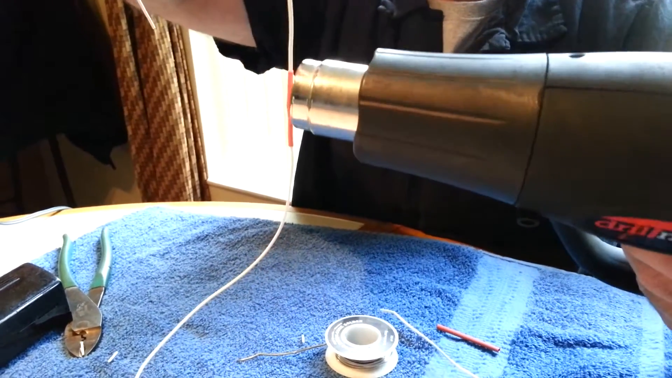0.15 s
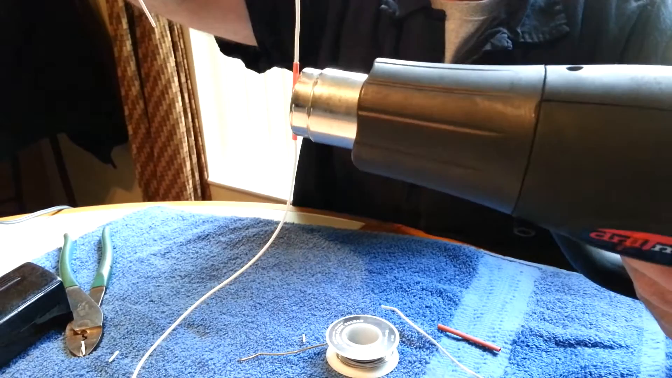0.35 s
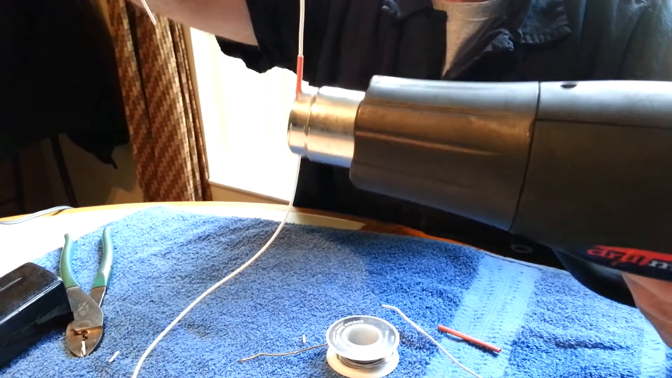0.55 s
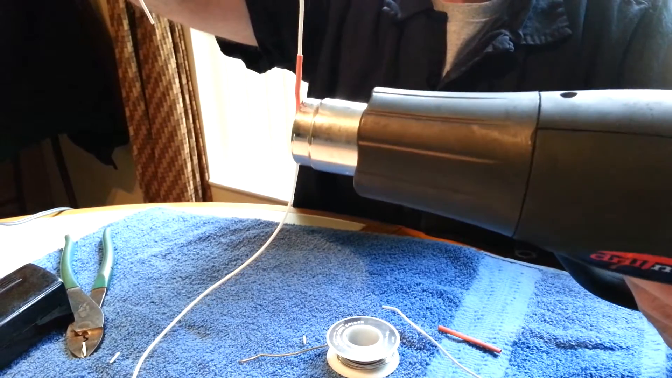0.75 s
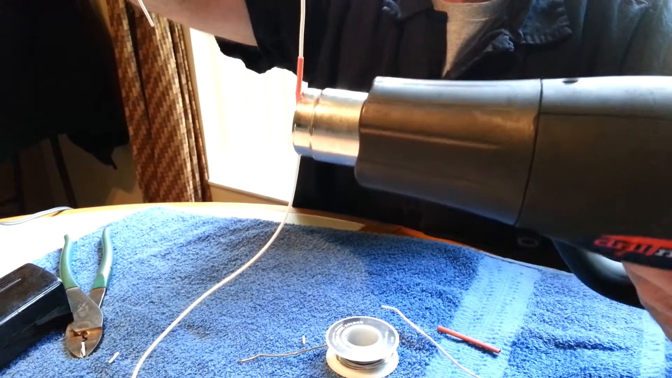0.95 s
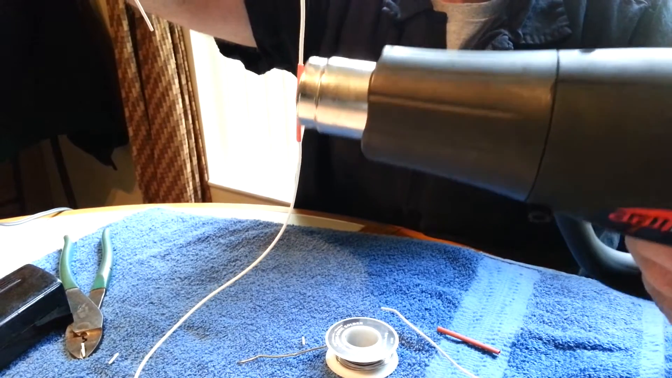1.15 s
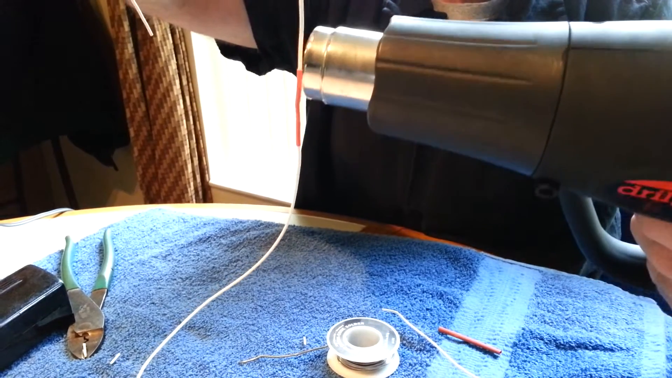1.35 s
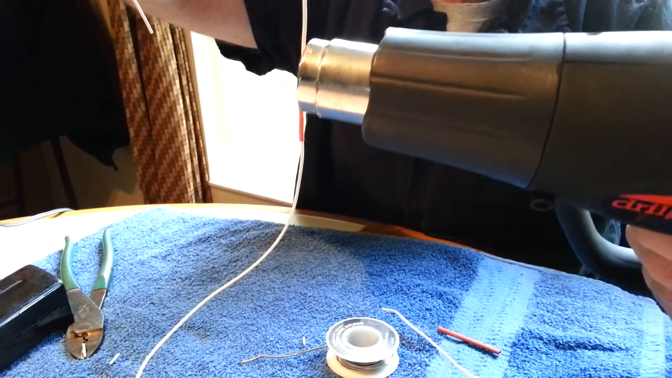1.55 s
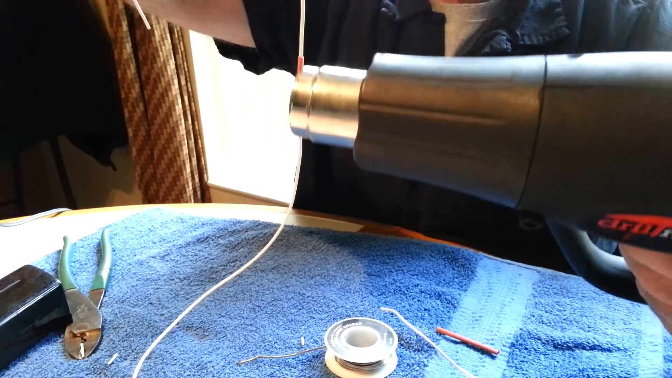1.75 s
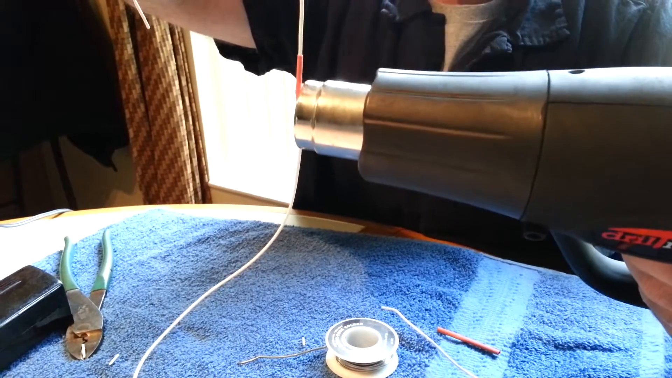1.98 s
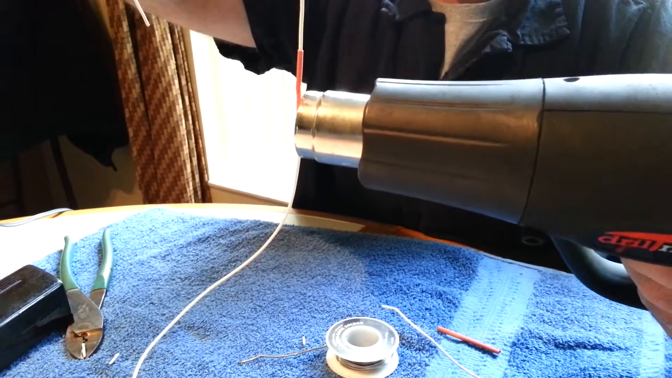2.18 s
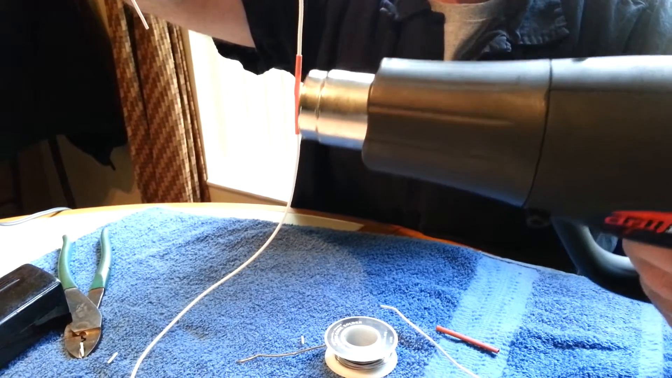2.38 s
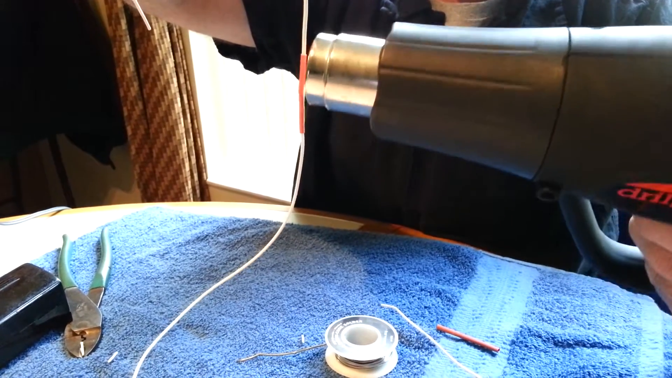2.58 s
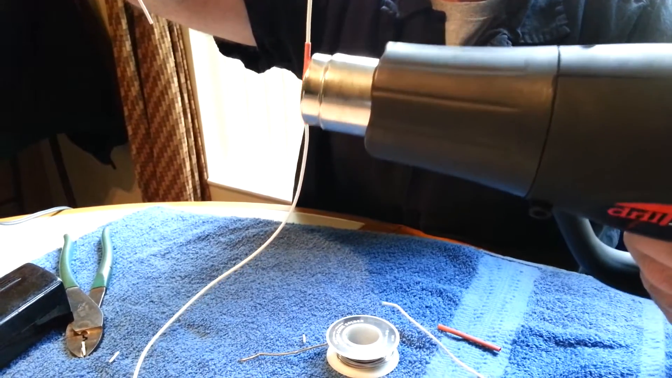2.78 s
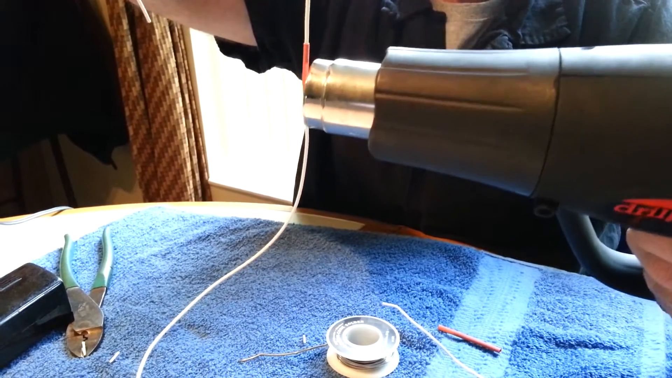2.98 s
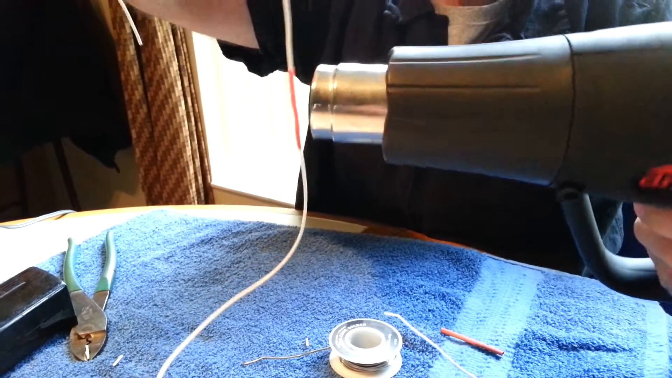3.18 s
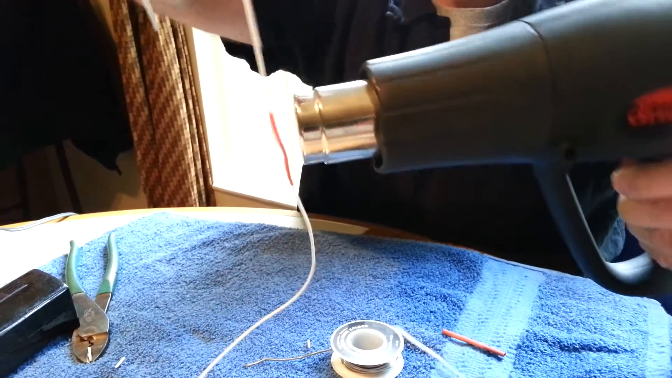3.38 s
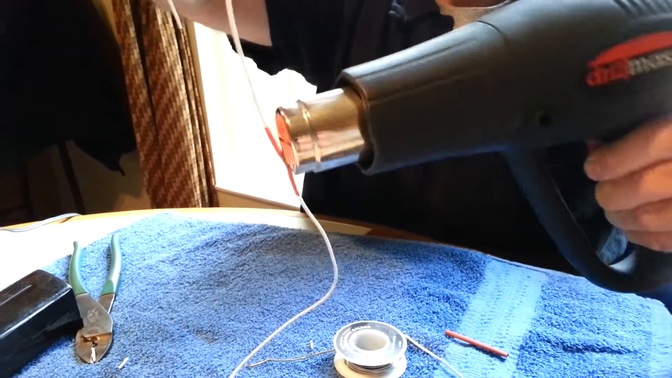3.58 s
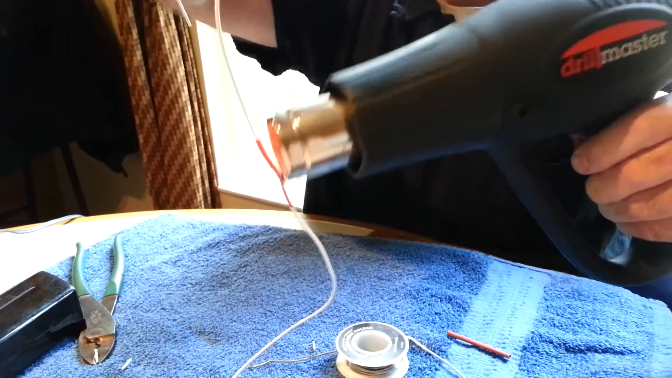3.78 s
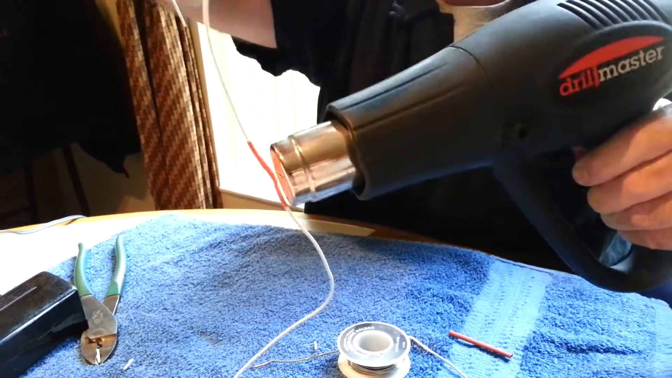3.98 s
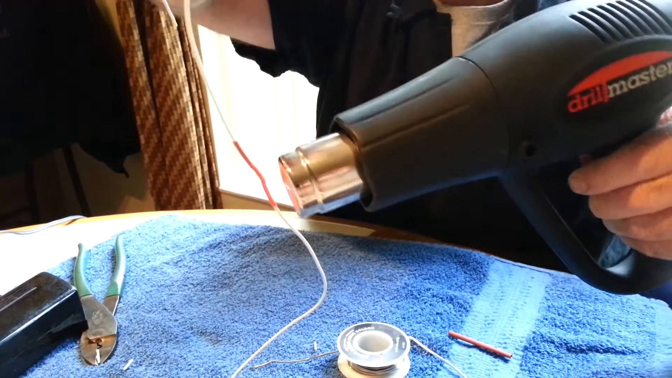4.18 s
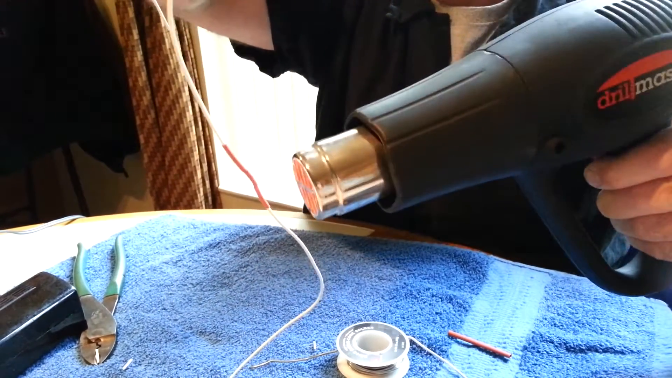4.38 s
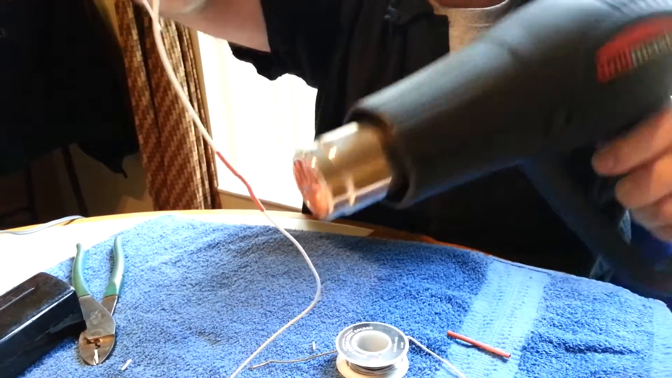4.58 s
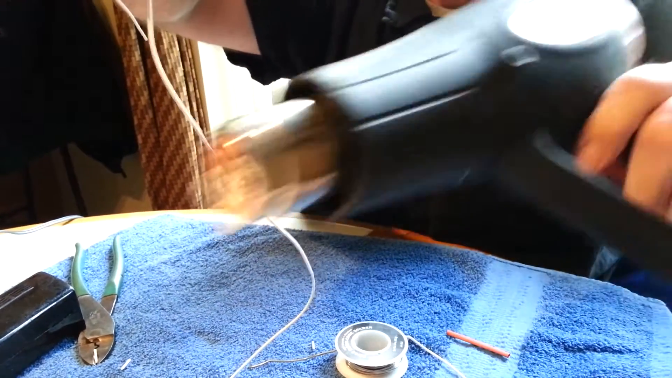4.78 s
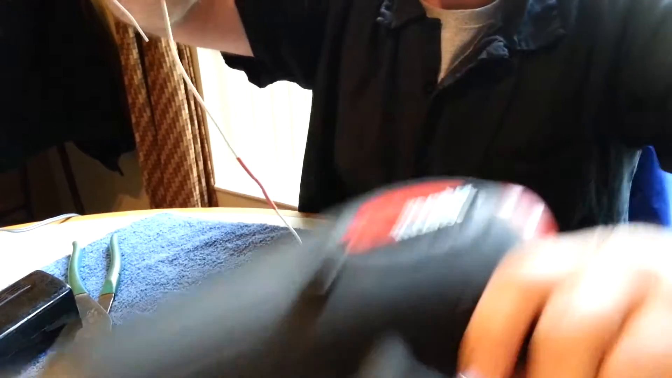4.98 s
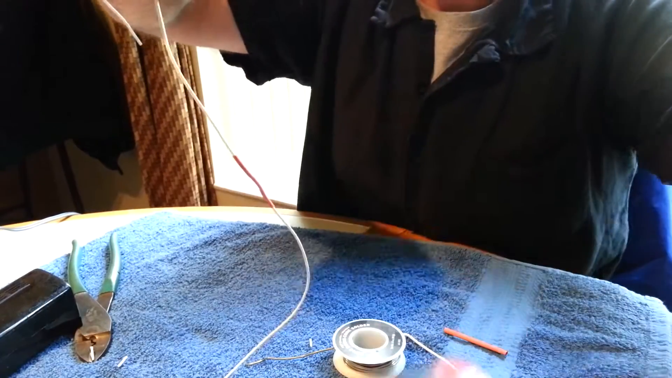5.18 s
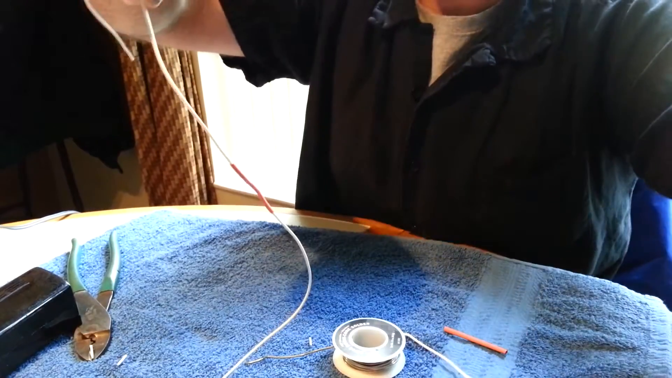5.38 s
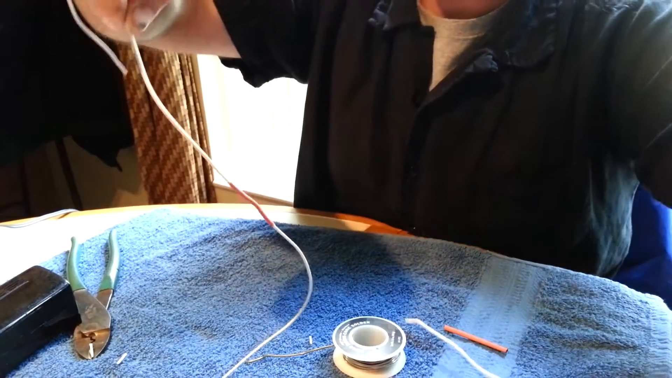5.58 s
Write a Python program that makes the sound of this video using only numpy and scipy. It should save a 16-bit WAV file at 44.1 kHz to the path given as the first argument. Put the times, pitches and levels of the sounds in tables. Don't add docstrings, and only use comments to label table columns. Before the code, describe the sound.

From the start a handheld heat gun runs at full power very close to a stereo microphone: a hollow mid-range barrel roar, a broad hissing jet, fine high fizz, and a steady cluster of electric motor tones, with a low hum near 244 Hz and bright whine up to around 14 kHz, leaning left in the treble. Brief level surges occur around 1.0, 1.5, 2.25 and 3.0 s. Between 3.15 and 3.6 s the gun turns, and the air and whine change colour, slightly softer. At about 4.34 s the switch snaps sharply; the powered whine stops almost at once and the rotor coasts down, a grainy, resonant whir falling in pitch while the air fades. From 4.9 s it is carried away quickly, with small plastic ticks near 4.9, 5.16 and 5.35 s. Two low padded thumps with rattly clicks land at 5.47 and 5.58 s over faint room hiss.

```python
import sys
import numpy as np
from scipy import signal
from scipy.fft import rfft, irfft, next_fast_len
from scipy.io import wavfile
from scipy.ndimage import uniform_filter1d

SR = 44100
rng = np.random.default_rng(int(sys.argv[2]) if len(sys.argv) > 2 else 0)


def put_to_file(sound):
    columns = np.atleast_2d(sound).T
    safe = np.clip(columns, -1, 1)
    whole_steps = np.round(safe * 32767)
    wavfile.write(sys.argv[1], SR, whole_steps.astype(np.int16))


def amplitude_ratio(level_db):
    exponent = np.asarray(level_db, float) / 20
    return 10 ** exponent


N = 249165

# (frequency [Hz], density [dB per Hz])
RUMBLE = [(18, -53), (30, -30), (91, -19), (125, -5), (173, -10), (195, 2.5), (265, -3), (347, -2),
          (500, -11.5), (650, -25), (1100, -120)]
ROOM_TONE = [(240, -40), (400, -10), (900, -7), (2300, -13), (4000, -7), (5500, -3), (6700, -5),
             (8200, -12), (14000, -21), (14700, -30)]
# (time [s], level [dB])
HISS = [
    (4.6, -63),
    (5.1, -46),
    (5.4, -51),
    (5.65, -45.5),
]
# (frequency [Hz], t60 [s])
WALLS = [(200, 0.06), (3000, 0.27), (6000, 0.058), (10000, 0.065)]
RUMBLE_DB, RUMBLE_AWAY = -50.5, 0.13

# (frequency [Hz], difference [dB])
LEAN = [
    [(60, -22), (200, 0), (380, 3.5), (690, 1.5), (1280, 7), (2360, -6), (4350, 5), (7000, -1.5), (8000, 43), (8400, 66)],
    [(60, -3), (200, 1), (380, -9), (690, 6.5), (1280, -2.5), (2360, 0), (4350, 7.5), (7000, 8), (7600, 10), (8000, 66)],
]
# (frequency [Hz], difference [dB])
LINE_LEAN = [
    [(244, 1), (2000, -3), (2930, 4), (4800, 12), (7500, 16), (9800, 19), (11000, 38), (14500, 42)],
    [(244, 1), (2930, -5), (3700, 10), (7500, 12), (9800, 30), (14500, 36)],
]
# (frequency [Hz], likeness [0-1])
ALIKE = [(140, 0.36), (240, 0.87), (360, .5), (850, 1), (1200, 0.54), (1700, 0.1), (3200, 0.63),
         (5500, 0.2)]
# (frequency [Hz], lead of the left [rad])
LEAD = [(150, 0.3), (550, 0.27), (1200, 0.63), (1700, -1.46), (2400, -1.37), (3200, -0.44), (5000, -1.05),
        (7000, -2.4)]
# (time [s], lift [dB], rise [s], fall [s])
LIFTS = [(1.0, 4.5, 0.017, .07), (1.11, 3, 0.054, 0.1), (1.534, 6, 0.0052, 0.15), (1.71, 3, 0.034, 0.055),
         (2.255, 5.5, 0.014, .09), (2.39, 0.5, .03, 0.064), (3.01, 4.5, 0.059, 0.052),
         (4.344, 5.5, 0.0048, 0.16)]

# (time [s], turn [0 side-on, 1 turned])
TURN = [
    (0, 0),
    (3.15, 0),
    (3.6, 0.97),
    (5.65, 1),
]
# (time [s], nearness [dB])
NEAR = [(0, 0.5), (.5, 0.5), (1.4, -0.5), (2.1, -.5), (2.7, -0.5), (3.3, 0), (3.9, 0.5), (4.3, 0), (4.7, 2),
        (4.95, 2.5), (5.2, -5)]
AWAY_S, AWAY_DB_PER_S = 4.9, 36

# (time [s], speed [revolutions per s])
SHAFT = [(0, 243.82), (.3, 243.89), (.45, 244.07), (.95, 244.07), (1.2, 244.22), (1.45, 243.96),
         (1.65, 244.03), (1.95, 244.28), (2.35, 244.29), (2.55, 244.02), (2.7, 243.57), (3.05, 243.9),
         (3.3, 243.65), (3.5, 243.3), (3.75, 243.41), (3.9, 243.58), (4.2, 243.68)]
OFF_S, DRAG_PER_S, IDLE_HZ = 4.335, 1.34, 8.5

# (time [s], blow [dB])
THUMPS = [
    (5.469, -9.5),
    (5.579, -12),
    (5.602, -16.5),
]
# (frequency [Hz], level [dB], t60 [s])
TABLE = [(137, -6.5, 0.31), (197, 0, 0.082), (236, 10.5, 0.056), (364, -2.5, 0.081), (600, -33, 0.017)]
# (time [s], peak [dB], ring [Hz], edge [dB], t60 [s])
TICKS = [(4.3445, -7.5, 4360, -12, 0.0073), (4.344, -14, 4560, -2, 0.016), (4.346, -11, 4600, -8, .012),
         (4.884, -23, 2880, -24, 0.0095), (4.9678, -24, 816, 0, 0.0094), (5.163, -31, 4500, -13, 0.0054),
         (5.1632, -17.5, 2960, -2.5, 0.018), (5.352, -20, 10700, 4.5, 0.0091),
         (5.3512, -30.5, 980, 2, 0.0091), (5.4693, -9.5, 1060, -1, 0.027), (5.5788, -10, 1160, -0.5, 0.027)]
SPLIT_HZ = 1300

# (frequency [Hz], width [Hz], level [dB])
CASING = [(4300, 260, 0), (5250, 350, -1), (5850, 300, 0), (6500, 300, -2), (7700, 350, -3),
          (8500, 350, -4), (9500, 450, 0), (10600, 500, -5)]
# (frequency [Hz], width [Hz], level [dB])
TUBE = [(780, 70, 0), (1170, 120, 1)]
# (time [s], level [dB])
BLADES = [
    (4.34, -50),
    (4.5, -44),
    (4.75, -47),
    (5.0, -66),
]
COMB_DB, COMB_POWER, COMB_AWAY = -46, .45, .6
BARS_DB, HOOT_DB = 3, -54

# (order [per revolution], side-on [dB], turned [dB])
ORDERS = [(1, -45, -44), (6, -57, -53), (12, -34.5, -48), (15, -43, -44), (16, -43, -50), (19, -46, -49),
          (20, -44, -51), (24, -51, -54), (25, -45, -49), (30, -46, -50), (31, -39.5, -49), (35, -53, -42),
          (36, -47, -58), (38, -45, -56), (39, -50, -41), (40, -34, -31), (41, -40, -38), (44, -48, -38),
          (45, -34, -39), (46, -40.5, -42), (47, -48, -54), (50, -41.5, -46), (51, -41, -52),
          (55, -39, -48), (56, -42.5, -45), (59, -40, -51)]
# (time [s], half width [s], order [per revolution], depth [dB])
NULLS = [(.45, .5, 12, 4), (2.2, .2, 12, 3), (3.42, .12, 12, 6), (3.36, .14, 45.5, 9), (3.47, .06, 40, 11),
         (4.23, .07, 40, 9), (3.93, .17, 51, 5), (.4, .25, 45.5, 3), (2.7, .25, 51, 4)]
FAINT_DB, FAINT_TURNED_DB, FAINT_SCATTER_DB = -52.5, -55, 2.5
WHINE_DB, WHINE_HOLD_S, WHINE_DB_PER_S = 2, 0.049, 300

# (frequency [Hz], density [dB per Hz])
BARREL = [
    [(240, -58), (400, -44), (448, -35), (477, -17), (618, -9), (670, -16), (723, -6), (873, 0), (1010, 0), (1280, -13.5), (1800, -32.5), (2340, -21), (3960, -120)],
    [(240, -24), (400, -22), (454, -33), (474, -9.5), (514, -13.5), (633, -3.5), (741, -10.5), (884, 1), (1030, -8.5), (1110, -1), (1800, -23), (2340, -93), (3960, -120)],
]
JET = [
    [(880, -72), (1500, -9), (2310, -7.5), (2770, -4), (2860, -6.5), (3080, -6.5), (3550, -1.5), (4740, -7), (5140, -11), (6640, -18), (7500, -17.5), (9750, -75), (16500, -120)],
    [(880, -54), (1500, -7.5), (1840, -4), (2260, -7), (2840, -1), (3170, -10.5), (3620, 0.5), (5580, -11.5), (6050, -9), (6470, -21), (7500, -27), (9750, -29), (16500, -120)],
]
# (frequency [Hz], density [dB per Hz])
FIZZ = [(6300, -29), (7000, -4), (7500, -1.5), (9600, 1), (10150, -2), (10700, -1), (11600, -4.5),
        (12400, -5), (13050, 7), (13500, 0.5), (14050, 5.5), (14500, -8), (14650, -45), (15000, -120)]
FIZZ_TURNED = [(6300, -20), (7000, 1), (8500, -4), (10500, -0.5), (11500, -2.5), (13000, -6), (14500, -3),
               (15000, -120)]
# (side-on [dB], turned [dB], exponent of rotor speed, share of the carried-off loss)
AIR = [
    (-28.5, -33.5, 1.7, 0.13),
    (-31.5, -34, 2.07, 1),
    (-40, -41.5, 1.15, 0.82),
]


def unit(x):
    return x / np.sqrt(np.mean(x ** 2) + 1e-20)


def along(points, hz):
    f, v = np.transpose(points)
    return np.interp(np.log(hz + 1), np.log(f + 1), v)


def curves(rows):
    s, *cols = np.transpose(rows)
    return [np.interp(np.arange(N) / SR, s, c) for c in cols]


def wobble(rate):
    knots = rng.standard_normal(int(N * rate / SR) + 4)
    return np.interp(np.arange(N) * rate / SR, np.arange(len(knots)), knots)


def filtered(x, response):
    m = next_fast_len(x.shape[-1] + 4096)
    spectrum = rfft(x, m) * response(np.fft.rfftfreq(m, 1 / SR))
    return irfft(spectrum, m)[..., :x.shape[-1]]


def sides(lean, hz):
    right = amplitude_ratio(-along(lean, hz))
    return np.array([2 / (1 + right), 2 * right / (1 + right)])


def rush(spectrum, lean, patchy_db):
    z = signal.stft(rng.standard_normal((2, N)), nperseg=512)[2]
    field = uniform_filter1d(rng.standard_normal(z.shape[1:]), 5, 0)
    field = uniform_filter1d(field, 10, 1)
    pair = signal.istft(z * amplitude_ratio(patchy_db * unit(field)), nperseg=512)[1][:, :N]

    def mid_side(hz):
        angle = np.arccos(np.clip(along(ALIKE, hz), -1, 1)) / 2
        return amplitude_ratio(along(spectrum, hz)) * [np.cos(angle), np.sin(angle)]

    def ports(hz):
        return sides(lean, hz) * np.exp(np.outer([.5j, -.5j], along(LEAD, hz)))

    mid, side = filtered(pair, mid_side)
    both = filtered(np.array([mid + side, mid - side]), ports)
    return both / np.std(both.mean(0))


def shaft_turns():
    coast = np.exp(-DRAG_PER_S * np.maximum(np.arange(N) / SR - OFF_S, 0))
    speed = IDLE_HZ + (curves(SHAFT)[0] - IDLE_HZ) * coast
    return speed, 2 * np.pi * np.cumsum(speed) / SR


def pose():
    speed, t = shaft_turns()[0], np.arange(N) / SR
    slow_db = 20 * np.log10(speed / curves(SHAFT)[0])
    away_db = -AWAY_DB_PER_S * np.maximum(t - AWAY_S, 0)
    return np.clip(curves(TURN)[0], 0, 1), curves(NEAR)[0], slow_db, away_db


def background():
    hiss_lean = [(400, 0), (4000, 3), (8000, 8), (14000, 12)]  # (Hz, left minus right dB)
    hiss = amplitude_ratio(curves(HISS)[0]) * rush(ROOM_TONE, hiss_lean, patchy_db=2.5)
    rumble_level = amplitude_ratio(RUMBLE_DB + RUMBLE_AWAY * pose()[3])
    return rumble_level * rush(RUMBLE, LEAN[0], patchy_db=2.5) + hiss


def room(x):
    hz, t, z = signal.stft(rng.standard_normal((2, SR // 2)), SR, nperseg=256)
    decay = amplitude_ratio(-60 * t / along(WALLS, hz)[:, None])
    tail = signal.istft(z * decay, SR, nperseg=256)[1]
    late = np.pad(x, (200, 0))[None]
    return signal.fftconvolve(late, tail / np.linalg.norm(tail[0]), axes=1)[:, :N]


def thumps():
    out, t = np.zeros(N + SR), np.arange(SR // 2) / SR
    for s, db in THUMPS:
        ring = sum(amplitude_ratio(level + rng.normal(0, 1.8) - 60 * t / t60) * np.sin(2 * np.pi * hz * t)
                   for hz, level, t60 in TABLE)
        blur = unit(filtered(rng.standard_normal(len(t)), lambda f: (f > 90) / (1 + (f / 420) ** 3)))
        ring = ring + amplitude_ratio(-11.0 - 60 * t / 0.35) * blur
        onset = 1 - np.exp(-t / 0.00017)
        out[round((s + .001) * SR):][:len(t)] -= amplitude_ratio(db - 5) * ring * onset
    return out[:N]


def ticks():
    out, t = np.zeros(N + SR), np.arange(SR // 10) / SR

    def ring(f, hz, width):
        return (1j * f * width * hz / (hz * hz - f * f + 1j * f * width * hz)) ** 2

    for s, db, hz, edge_db, t60 in TICKS:
        burst = rng.standard_normal((2, len(t))) * amplitude_ratio(-60 * t / max(t60, .003))
        burst[:, 0] = 3
        body = filtered(burst[0], lambda f: ring(f, hz, .8))
        edge = filtered(burst[1], lambda f: ring(f, 3900, 1.1) + .1 * ring(f, 11000, 1.2))
        snap = body / abs(body).max() + amplitude_ratio(edge_db) * edge / abs(edge).max()
        out[round(s * SR):][:len(t)] += amplitude_ratio(db) * snap
    return out[:N]


def contacts():
    snaps, other, blows = ticks(), ticks(), thumps()

    def low(f):
        return 1 / (1 + (f / SPLIT_HZ) ** 4)

    right = filtered(snaps, low) + filtered(other, lambda f: 1.53 * (1 - low(f)))
    direct = np.array([snaps, right])
    near = 0.88 * direct + amplitude_ratio(-10) * room(snaps) + amplitude_ratio(-10.5) * room(blows)
    lean = [(1000, 1.5), (4000, 10.5), (8000, 12), (14000, 23)]  # (Hz, left minus right dB)
    return filtered(near, lambda f: sides(lean, f)) + blows


def resonances(f, peaks):
    return sum((-1) ** k * amplitude_ratio(db) * 1j * f * w / (c * c - f * f + 1j * f * w)
               for k, (c, w, db) in enumerate(peaks))


def coasting():
    start = round(OFF_S * SR)
    speed, turns = (v[start:] for v in shaft_turns())
    slow_db, away_db = pose()[2:]
    drag = np.zeros(N)
    for order in range(19, 77):
        bar_db = (BARS_DB, -3, -11, -11, -5)[order % 5]
        strength_db = bar_db + 4 * wobble(20)[start:] - .06 * order
        line = np.sin(order * turns + rng.uniform(0, 2 * np.pi))
        drag[start:] += amplitude_ratio(strength_db) * line * (order * speed < 14000)

    def shell(f):
        response = resonances(f, CASING)
        return response * np.sqrt(abs(response))

    level = amplitude_ratio(COMB_DB + COMB_POWER * slow_db + COMB_AWAY * away_db)
    lean = [(2000, 9), (5000, 11), (8000, 29), (11000, 77)]  # (Hz, left minus right dB)
    out = filtered(filtered(level * drag, shell), lambda f: sides(lean, f))
    blades = amplitude_ratio(curves(BLADES)[0] + 1.3 * wobble(30))[start:] * np.sin(12 * turns)
    hoot = filtered(amplitude_ratio(HOOT_DB) * np.sin(10 * turns), lambda f: resonances(f, TUBE))
    out[:, start:] += blades + hoot
    return out


def motor():
    end = round((OFF_S + .3) * SR)
    t, turns = np.arange(end) / SR, shaft_turns()[1][:end]
    turned, near_db = (v[:end] for v in pose()[:2])
    faint = FAINT_SCATTER_DB * rng.standard_normal((60, 2)) + [FAINT_DB, FAINT_TURNED_DB]
    lines = {order: faint[order] for order in range(26, 59)}
    lines.update({order: db for order, *db in ORDERS})
    out = np.zeros((2, N))
    for order, db in lines.items():
        hz = order * SHAFT[0][1]
        side_on_db, turned_db = [[db[k], db[k] - along(LINE_LEAN[k], hz)] for k in range(2)]
        depth_db = 1.6 if order > 1 else 1
        flicker_db = depth_db * (wobble(4) + .8 * wobble(35))[:end] - 1.5
        for s, width, centre, depth in NULLS:
            if abs(order - centre) < 1.2:
                flicker_db -= depth * np.exp(-((t - s) / width) ** 2)
        cut_db = WHINE_DB_PER_S * np.maximum(t - OFF_S - WHINE_HOLD_S * (order == 1), 0)
        level_db = np.outer(side_on_db, 1 - turned) + np.outer(turned_db, turned) + flicker_db - cut_db
        phase = rng.uniform(0, 2 * np.pi) + np.array([[0], [-along(LEAD, hz)]])
        out[:, :end] += amplitude_ratio(level_db) * np.sin(order * turns + phase)
    out[:, :end] *= np.sqrt(2) * amplitude_ratio(WHINE_DB + near_db)
    return out


def air():
    turned, near_db, slow_db, away_db = pose()
    barrel, jet, fizz = (amplitude_ratio(side_on + (facing - side_on) * turned + near_db + power * slow_db + share * away_db)
                         for side_on, facing, power, share in AIR)

    def posed(spectra, patchy_db):
        return sum(np.sqrt(weight) * rush(spectrum, lean, patchy_db)
                   for weight, spectrum, lean in zip((1 - turned, turned), spectra, LEAN))

    roar = barrel * amplitude_ratio(0.9 * wobble(20)) * posed(BARREL, patchy_db=0.5)
    hiss = jet * posed(JET, patchy_db=1.2)
    return roar + hiss + fizz * posed((FIZZ, FIZZ_TURNED), patchy_db=2.4)


def scene():
    return background() + contacts() + coasting() + motor() + air()


def gain_control():
    t = np.arange(N) / SR
    return amplitude_ratio(sum(db * np.clip((t - s) / rise, 0, 1) * np.exp(-np.maximum(t - s - rise, 0) / fall)
                   for s, db, rise, fall in LIFTS))


def top_cut(x):
    return signal.sosfilt(signal.butter(12, 15380, fs=SR, output="sos"), x)


def record(dry):
    def microphone(f):
        return (1j * f / 70 / (1 + 1j * f / 70)) ** 3 * (f < 14800)

    return top_cut(filtered(dry * gain_control(), microphone))


dry = scene()
out = record(dry)
put_to_file(out)
```